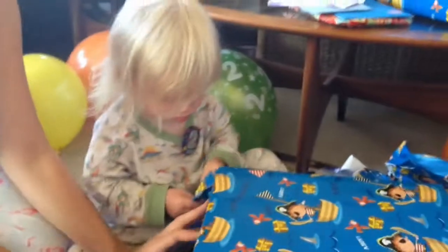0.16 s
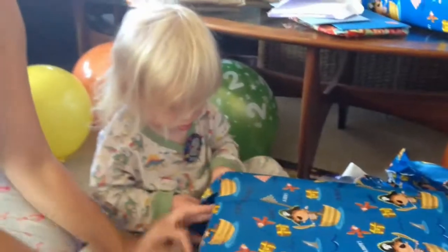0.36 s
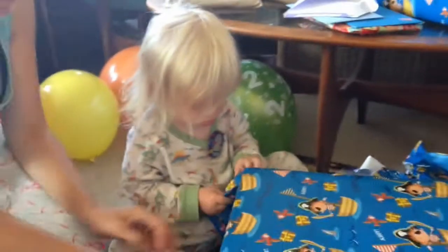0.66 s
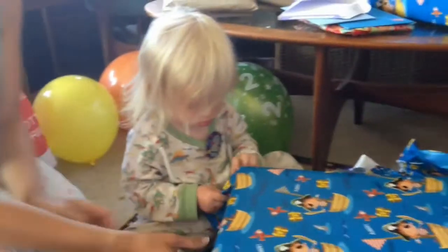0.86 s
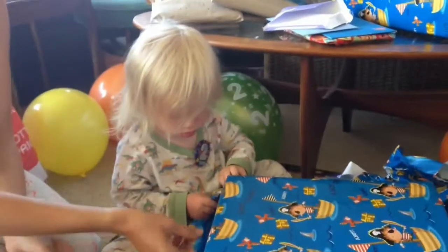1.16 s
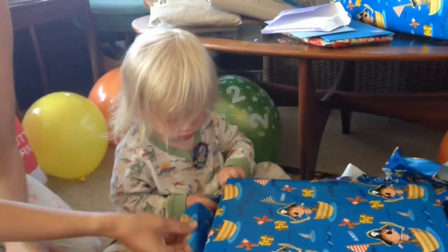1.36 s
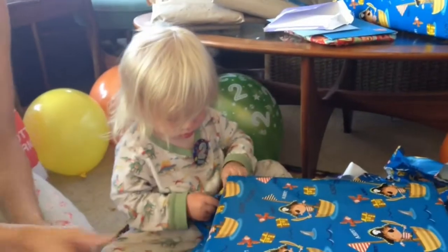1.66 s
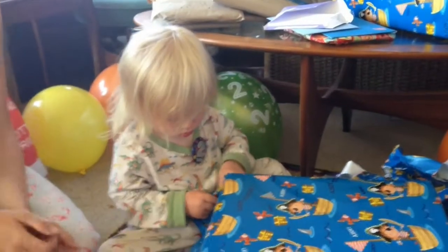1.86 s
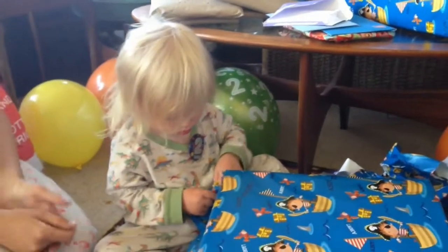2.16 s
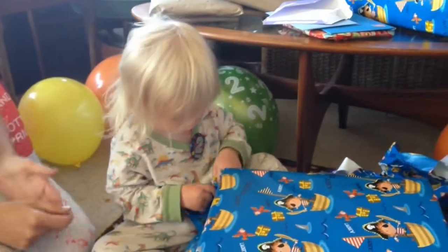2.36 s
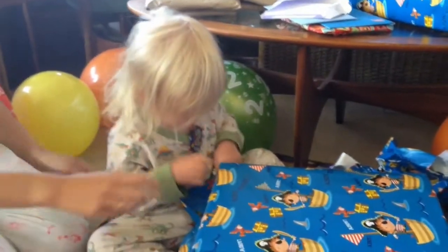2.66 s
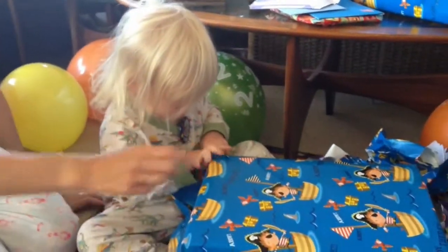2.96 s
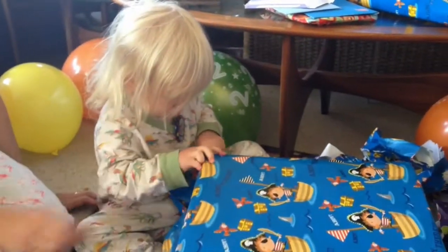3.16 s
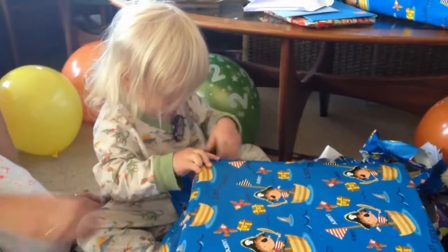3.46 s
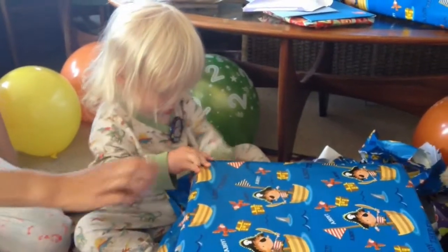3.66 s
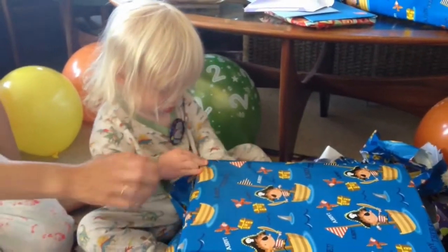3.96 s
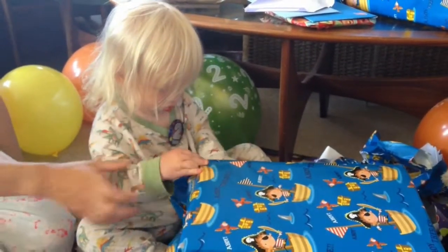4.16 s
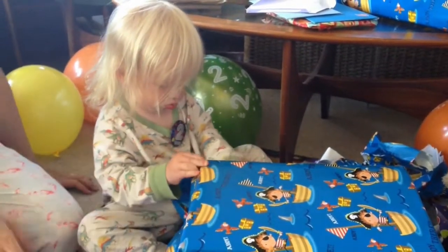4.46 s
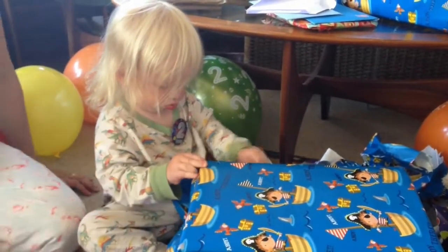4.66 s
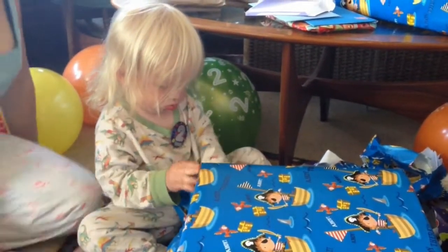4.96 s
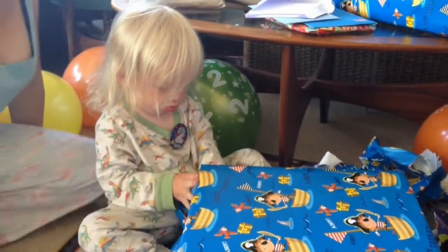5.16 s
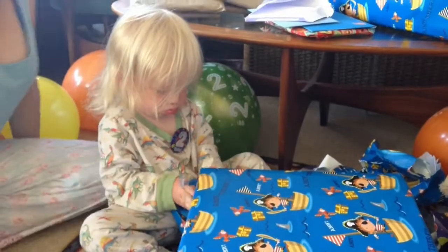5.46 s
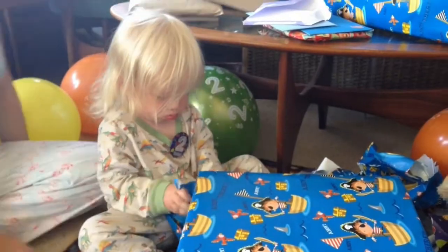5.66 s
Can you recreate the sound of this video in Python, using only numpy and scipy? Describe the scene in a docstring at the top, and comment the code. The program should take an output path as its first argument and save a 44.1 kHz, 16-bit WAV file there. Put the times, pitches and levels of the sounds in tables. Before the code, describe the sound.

Thin wrapping paper is picked at and torn in short rips off a hollow cardboard box, then rustles more softly.

```python
"""Unwrapping a cardboard box

A carpeted living room, one microphone close to thin wrapping paper being picked at and torn off.
Fibres break as dense crackle that comes in clumps, creases snap one by one, and the hollow box
booms along whenever it is pulled or pressed. Behind it, bodies shift on the carpet over a low hush."""
import sys
import numpy as np
from scipy import signal
from scipy.fft import rfft, irfft
from scipy.io import wavfile

SR = 44100
rng = np.random.default_rng(int(sys.argv[2]) if len(sys.argv) > 2 else 0)


def unload_audio(sound):
    """Save the sound as a 16-bit wav file, at the path given as the first command line argument."""
    columns = np.transpose(np.atleast_2d(sound))
    # keep every value between -1 and 1, then stretch to whole-number steps
    steps = np.round(np.clip(columns, -1, 1) * 32767)
    wavfile.write(sys.argv[1], SR, steps.astype(np.int16))


N = 257014


def from_db(db):
    """Decibels to gain."""
    return 10 ** (np.asarray(db) / 20)


def unit_rms(x):
    """Scale to rms 1."""
    return x / np.sqrt(np.mean(x ** 2) + 1e-20)


def in_time(rows):
    """Rows led by a time in seconds become one curve a column, one value a sample."""
    times, *columns = np.transpose(rows)
    return [np.interp(np.arange(N) / SR, times, column) for column in columns]


def at_hz(points, hz):
    """Read a spectrum on a log-frequency axis."""
    points_hz, points_db = np.transpose(points)
    return np.interp(np.log(hz), np.log(points_hz), points_db)


def drift(rate_hz):
    """Slow chance: noise through a double one-pole low-pass, spread 1."""
    step = 20
    pole = np.exp(-2 * np.pi * rate_hz * step / SR)
    slow = signal.lfilter([1], [1, -2 * pole, pole * pole], rng.standard_normal(N // step + 2002))[2000:]
    return np.interp(np.arange(N) / step, np.arange(len(slow)), unit_rms(slow))


def resonance(x, hz, width_hz):
    """Two-pole resonance, gain 1 at its peak."""
    r = np.exp(-np.pi * width_hz / SR)
    poles = [1, -2 * r * np.cos(2 * np.pi * hz / SR), r * r]
    return signal.lfilter(np.array([1, 0, -1]) * (1 - r * r) / 2, poles, x + 1e-18)


def room_tone(level_db=-64):
    """The steady hush of the living room, with microphone hiss."""
    # Each row: frequency in Hz, relative noise density in dB.
    spectrum = [(24, -36.5), (40, -12), (216, -6.5), (582, -7), (1200, -21.5), (4230, -12), (15000, -14)]
    hz = np.maximum(np.arange(N // 2 + 1) * SR / N, 1)
    hush = irfft(rfft(rng.standard_normal(N)) * from_db(at_hz(spectrum, hz)), N)
    return from_db(level_db) * unit_rms(hush)


def bodies_shifting(band_hz=(49, 136), lumpy_db=4.0):
    """Bodies shift on the carpet: a dull lumpy rumble reaches the microphone through the floor."""
    # Each row: time in seconds, rumble level in dB.
    movement = [(0.0, -57), (0.45, -55.5), (0.58, -68), (3.9, -67), (4.4, -58), (4.6, -66.5), (5.16, -59.5),
                (5.83, -75.5)]
    rumble = signal.sosfilt(signal.butter(2, band_hz, "band", fs=SR, output="sos"), rng.standard_normal(N))
    return from_db(in_time(movement)[0] + lumpy_db * drift(12)) * unit_rms(rumble)


def room_reflections(x, t60_s=0.19, wall_cut_hz=10000):
    """Sound returns from nearby walls: eight feedback delays, duller on every round."""
    out, pole = np.zeros(N), np.exp(-2 * np.pi * wall_cut_hz / SR)
    for k, lag in enumerate((rng.uniform(.011, .035, 8) * SR).astype(int)):
        loop, state = x.copy(), [0.]
        gain = from_db(-60 * lag / SR / t60_s)
        for i in range(lag, N, lag):
            echo, state = signal.lfilter([gain * (1 - pole)], [1, -pole], loop[i - lag:i], zi=state)
            loop[i:i + lag] += echo[:N - i]
        out += (loop - x) * (-1) ** k
    return out


def box_boom(pull_db, folds_db, lumpy_db=4.0, give=2.5, reach=0.19):
    """Rubbing paper and knocks ring the hollow box; large folds help drive its lesser modes."""
    # Box modes, the main one first. Each row: frequency in Hz, width in Hz, rub gain in dB.
    modes = [(206.1, 28, -2.5), (125, 130, -28), (163.5, 33, -11), (291, 67, -6), (371.3, 77, -10),
             (474, 43.5, -10.5)]
    # Hands knocking the box. Each row: start in seconds, strength in dB, pitch of the blow in Hz.
    knocks = [(0.145, -44, 358), (0.199, -34, 353), (0.378, -29.5, 248), (0.395, -34, 128),
              (0.51, -40, 247), (1.083, -43.5, 208), (1.632, -42, 214), (1.705, -39, 224),
              (2.253, -45, 222), (2.485, -43.5, 213), (2.496, -43.5, 474), (3.582, -54, 240),
              (4.316, -54.5, 187), (4.367, -49.5, 297), (4.435, -51, 188), (4.788, -50, 225),
              (4.929, -54, 193), (5.059, -42, 193), (5.202, -51.5, 163), (5.646, -48.5, 474),
              (5.809, -52, 486)]
    start_s, blow_db, blow_hz = np.transpose(knocks)
    starts, out = np.round(start_s * SR).astype(int), 0
    for k, (hz, width_hz, gain_db) in enumerate(modes):
        drive_db = pull_db if k == 0 else 0.57 * pull_db + 0.44 * folds_db
        rub = from_db(drive_db + gain_db + 21.5 + lumpy_db * drift(25)) * rng.standard_normal(N)
        nearness = np.exp(-(np.log(blow_hz / hz) / reach) ** 2)   # a blow moves modes near its pitch
        blows = np.zeros(N)
        blows[starts] = from_db(blow_db) * nearness * SR / (np.pi * width_hz)
        push = np.e * resonance(blows, hz, give * width_hz)   # the wall gives first, so the boom swells
        out = out + resonance(rub + push, hz, width_hz)
    return out


def hands(bite_db_per_s=4000, let_go_db_per_s=349, box_let_go_db_per_s=258, box_swell_share=0.73,
          palm_folds_db=-4, palm_flap_hz=2980):
    """Curves for paper and box: pulls bite, swell, hold and let go; the loudest touch sets the colour."""
    # Palms resting and sliding between pulls. Each row: time in seconds, then crackle, pull on the box,
    # stick-slip depth and crispness, all in dB.
    palms = [(.04, -55, -51.5, 16, -15), (.2, -41.5, -41, 7, -8), (.36, -48, -51.5, 6.5, -4),
             (.7, -60, -69, 12, -14), (.98, -53, -52.5, -7.5, -11), (1.27, -51, -58, -10, -14),
             (1.9, -55, -50, 16, -10), (2.2, -52.5, -52, 9, -5.5), (2.78, -60.5, -66, 2.5, -11),
             (3.1, -55, -59, 5.5, -9.5), (3.4, -54.5, -52, 4, -11.5), (3.6, -55, -55.5, 8, -10.5),
             (3.72, -64.5, -61, 8.5, -17), (3.87, -60, -55.5, 8, -3), (4.27, -62.5, -58, 5.5, -13),
             (4.45, -52.5, -60, -4, -14), (4.82, -50, -61.5, 4.5, -17.5), (5.1, -48, -54, 4.5, -6.5),
             (5.5, -41, -53, 1, -15.5), (5.83, -44.5, -57.5, 3, -13.5)]
    # Pulls at the paper. Each row: start, swell and hold in seconds; opening crackle, full crackle,
    # pull on the box, stick-slip depth, crispness and large folds in dB; ring of the taut flap in Hz.
    pulls = [(.004, 0.0046, 0.0052, -36, -72, -47.5, 6, -1, -19, 4100),
             (0.043, 0.0073, 0.012, -44, -44, -57, 5.5, -8, -11, 4240),
             (0.185, 0.0068, 0.0074, -38, -25, -34, -10, -7.5, -9, 3720),
             (0.379, 0.0022, 0.045, -17, -26.5, -35.5, 3.5, -6, -6.5, 4500),
             (0.489, 0.0091, 0.017, -52, -37, -52, 11.5, -8, -1.5, 3900),
             (0.59, 0.019, 0.03, -50, -46, -45.5, 4, -11, -6, 2350),
             (1.012, 0.008, 0.028, -42, -39.5, -45, 4, -3.5, -5, 2600),
             (1.078, 0.073, 0.03, -37, -28, -44.5, 3.5, -4, -7, 2400),
             (1.3, 0.031, 0.046, -42.5, -27, -42, 2, -4.5, -9.5, 4500),
             (1.48, 0.18, 0.017, -50, -40.5, -46, 7, -4.5, -5, 3930),
             (1.703, 0.033, 0.066, -30, -30, -42, 1.5, -16.5, -11.5, 2770),
             (1.968, 0.022, 0.052, -41, -42.5, -59, 8, -13, -6, 2500),
             (2.081, 0.0038, 0.026, -42, -39, -43, 8, -10, -6, 4600),
             (2.247, 0.0095, 0.015, -49, -42.5, -57, 5, -9, -6, 2500),
             (2.319, 0.12, 0.018, -41.5, -34.5, -46, 4, -7, -6, 3600),
             (2.457, 0.028, 0.033, -30.5, -24.5, -39.5, 3, -12, -6, 2230),
             (2.603, 0.013, 0.054, -53, -47.5, -48.5, 4, -3.5, -3, 2480),
             (2.917, 0.013, 0.044, -44, -52, -62, 7, -3.5, -5.5, 3160),
             (3.901, 0.013, 0.053, -57, -51, -66, 3.5, -4.5, -6, 7900),
             (3.971, 0.0057, 0.031, -48, -38.5, -48.5, 6.5, -7, -5, 3600),
             (4.357, 0.0096, 0.0049, -57, -36.5, -44, 2, 2, -4, 4430),
             (4.867, 0.086, 0.011, -54.5, -47, -60, 14, 13, -11, 4000),
             (5.059, 0.0041, 0.0053, -67, -46, -47, 12.5, 16, -3, 5250)]
    t = np.arange(0, N + 16, 16) / SR
    palm_s, *columns = np.transpose(palms)
    level_db, pull_db, grip_db, crisp_db = [np.interp(t, palm_s, column) for column in columns]
    paper_power, box_power = from_db(2 * level_db), from_db(2 * pull_db)
    colour = paper_power * np.array(np.broadcast_arrays(grip_db, crisp_db, palm_folds_db,
                                                        np.log(palm_flap_hz)))
    for start_s, swell_s, hold_s, opening_db, full_db, box_db, grip, crisp, folds, flap_hz in pulls:
        swell_left_db = (full_db - opening_db) * (1 - np.clip((t - start_s) / swell_s, 0, 1))
        bite_db = bite_db_per_s * np.maximum(start_s - t, 0)
        released_s = np.maximum(t - start_s - swell_s - hold_s, 0)
        tear_db = full_db - swell_left_db - bite_db - let_go_db_per_s * released_s
        tug_db = box_db - box_swell_share * swell_left_db - bite_db - box_let_go_db_per_s * released_s
        tear_power = from_db(2 * np.maximum(tear_db, -150))
        paper_power += tear_power
        box_power += from_db(2 * np.maximum(tug_db, -150))
        colour += np.outer([grip, crisp, folds, np.log(flap_hz)], tear_power)
    grip_db, crisp_db, folds_db, log_flap = colour / paper_power
    level_db, pull_db = 10 * np.log10([paper_power, box_power])
    return in_time(np.transpose([t, level_db, pull_db, grip_db, crisp_db, folds_db, np.exp(log_flap)]))


def crease_snaps(rise_s=.001, t60_s=.022, spread_db=2.5, sharpness=6.5, neighbour_db=-5, tick_s=.0006):
    """A crease snaps as a dry burst at its own pitch and two chance neighbours, under a bright tick."""
    # Each row: start in seconds, level in dB, centre in Hz, tick offset from that level in dB.
    creases = [(0.1004, -28.5, 3380, -1), (0.1219, -19, 3870, -21), (0.148, -19, 4000, -18),
               (0.169, -17.5, 4160, -6), (0.2007, -13.5, 3880, 4), (0.379, -6.5, 4600, -3),
               (0.43, -13, 4840, 1), (0.467, -20.5, 3920, -19), (0.4977, -30, 2650, -13),
               (0.51, -19.5, 3460, -26), (0.5287, -23.5, 5540, 5.5), (0.615, -18, 2430, -24),
               (0.803, -36.5, 3300, -27.5), (0.881, -41, 1220, -30), (0.9967, -33, 2900, 0),
               (1.0142, -26, 2370, 0), (1.078, -22, 1240, -3), (1.405, -21, 3500, -4),
               (1.487, -25.5, 2450, -4), (1.547, -28, 3700, -20), (1.565, -40, 3900, -10),
               (1.5758, -19, 3700, -18), (1.602, -21, 3920, -30), (1.617, -19, 3830, -24),
               (1.6355, -20.5, 3570, -28), (1.6723, -16, 4500, -24), (1.705, -25.5, 3320, -20),
               (1.7238, -18, 2400, -4), (1.74, -19.5, 2290, -37), (1.763, -21.5, 5000, -23),
               (1.7803, -20, 4384, -24), (1.919, -28.5, 1710, -7), (1.9987, -30, 2520, -26),
               (2.0293, -26.5, 1950, -18), (2.0804, -25, 4400, -27), (2.1251, -25, 4340, -24),
               (2.1837, -31.5, 4100, 5), (2.2544, -27.5, 1220, -18), (2.2817, -24.5, 5050, -25),
               (2.333, -24, 1200, -11), (2.377, -19, 2530, -4), (2.401, -28, 3900, -1),
               (2.4234, -25.5, 4400, 9), (2.441, -18, 3830, 1), (2.559, -22.5, 2180, -3),
               (2.621, -25.5, 1700, 0), (2.6395, -19.5, 4450, -5), (2.8091, -29, 4200, -24),
               (2.9182, -33, 4180, -3), (3.039, -29, 1280, -28), (3.112, -36, 3350, -12),
               (3.1495, -34, 2340, -9), (3.2082, -23.5, 2440, -10), (3.4144, -33, 2520, -25),
               (3.488, -35, 2420, -23), (3.6406, -35, 1310, -29), (3.7659, -31, 1130, -30),
               (3.806, -36, 3930, -58), (3.9761, -14.5, 7700, -17), (3.9812, -27, 3680, 10),
               (4.095, -40, 1240, 11), (4.164, -36, 1180, -6), (4.3698, -21, 4370, 2.5),
               (4.4356, -31.5, 2170, -3), (4.8822, -29.5, 5160, 11.5), (4.9218, -24, 3930, -17),
               (4.944, -20.5, 3970, -12), (5.06, -28.5, 5890, 7.5), (5.479, -14.5, 2600, -12),
               (5.571, -28.5, 3450, -29), (5.6398, -24.5, 4370, -9)]
    length = 3000
    out, t = np.zeros(N + length), np.arange(length) / SR
    chances = rng.standard_normal((len(creases), 3))
    noises = rng.standard_normal((len(creases), 2, length))
    treble = signal.butter(2, 6000, "high", fs=SR, output="sos")
    for (start_s, level_db, hz, tick_db), (stretch, below, above), noise in zip(creases, chances, noises):
        decay_s = t60_s * from_db(spread_db * stretch)
        envelope = np.minimum(t / rise_s, 1) * from_db(-60 * t / decay_s)
        crack = noise[0] * envelope
        burst = resonance(crack, hz, hz / sharpness) * np.sqrt(3000 / hz)
        burst += from_db(-9) * resonance(crack, 4000, 1030)   # a broad ring common to all creases
        for near_hz in (hz * 0.682 * from_db(1.2 * below), min(hz * 1.427 * from_db(1.4 * above), 14000)):
            ring = resonance(crack, near_hz, near_hz / sharpness) * np.sqrt(3000 / near_hz)
            burst += from_db(neighbour_db) * ring
        tick = signal.sosfilt(treble, noise[1] * (0.63 * envelope + np.exp(-t / tick_s)))
        at = round(start_s * SR)
        out[at:at + length] += from_db(level_db - 3.5) * burst / np.abs(burst).max()
        out[at:at + length] += from_db(level_db + tick_db - 2.5) * tick / np.abs(tick).max()
    return out[:N]


def paper_crackle(level_db, grip_db, crisp_db, folds_db, flap_hz, breaks_per_s=14000, sharpness=4.2,
                  patchy_db=2.5, crinkles_per_s=160, crinkle_db=10, flap_db=8.5, flap_octaves=0.12):
    """Breaking fibres: random clicks, each ringing a patch of paper of its own size for a few cycles."""
    # The colour of thin paper. Each row: frequency in Hz, relative level in dB.
    spectrum = [(500, -5), (900, 2), (1200, -6), (1500, -0.5), (2300, -1), (3200, -4), (4600, 2),
                (6000, 2.5), (10000, 0.5), (15000, -6.5)]
    sizes = from_db(-np.minimum(rng.exponential(1, N), 4)) * rng.choice([-1, 1], N)
    breaks = sizes * (rng.random(N) < breaks_per_s / SR)
    # Small creases give, louder where the grip is uneven.
    crinkles = (rng.random(N) < crinkles_per_s / SR) * from_db(crinkle_db + grip_db)
    clumps = from_db(grip_db * np.tanh(drift(45) / 1.3))   # the tear sticks and slips
    break_patch, crinkle_patch = rng.integers(0, 26, N), rng.uniform(4.5, 22.0, N)
    sheet = 0
    for k, hz in enumerate(np.geomspace(560, 15500, 26)):
        fibres = unit_rms(breaks * (break_patch == k))
        # A crease shakes several neighbouring patches.
        crease = crinkles * np.exp(-((crinkle_patch - k) / 1.6) ** 2) * rng.standard_normal(N)
        width_hz = hz / sharpness
        patch = resonance(resonance(fibres + crease, hz, width_hz), hz, width_hz) * np.sqrt(SR / width_hz)
        small = np.interp(np.log(hz), np.log([3500, 8000]), [0, 1])
        large = np.interp(np.log(hz), np.log([1200, 1900]), [1, 0])
        taut = np.clip(grip_db / 6.3, 0, 1)   # a smooth slide leaves the flap slack
        flap = taut * np.exp(-(np.log2(hz / flap_hz) / flap_octaves) ** 2)
        paper_db = at_hz(spectrum, hz) + 10 * np.log10(hz / 3000)
        touch_db = small * crisp_db + large * folds_db + flap * flap_db
        sheet = sheet + patch * from_db(paper_db + touch_db + patchy_db * drift(18.3))
    crackle = sheet * clumps * from_db(level_db - 16.5)
    panel = resonance(crackle, hz=1183, width_hz=162)   # a stiff face of the box rings along
    return crackle + from_db(folds_db + 12) * panel


def scene(room_db=-16):
    """Paper and box close to the microphone, a little room around them."""
    level_db, pull_db, grip_db, crisp_db, folds_db, flap_hz = hands()
    paper = paper_crackle(level_db, grip_db, crisp_db, folds_db, flap_hz) + crease_snaps()
    close = paper + box_boom(pull_db, level_db + folds_db)
    return (close + from_db(room_db) * room_reflections(close) + bodies_shifting() + room_tone())[None]


def record(dry, bass_hz=45, top_hz=15350, stop_hz=16484):
    """The microphone chain loses the deep bass and falls off at the top, then cuts steeply."""
    lean = signal.sosfilt(signal.butter(2, bass_hz, "high", fs=SR, output="sos"), dry)
    soft = signal.sosfilt(signal.cheby1(5, 1, top_hz, fs=SR, output="sos"), lean)
    return signal.sosfilt(signal.cheby2(14, 80, stop_hz, fs=SR, output="sos"), soft)


dry = scene()
out = record(dry)
unload_audio(out)
```